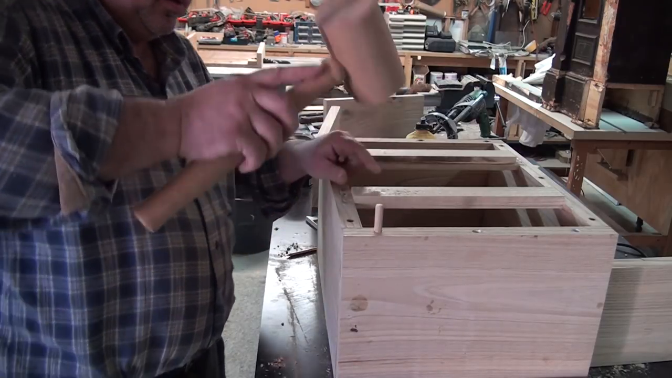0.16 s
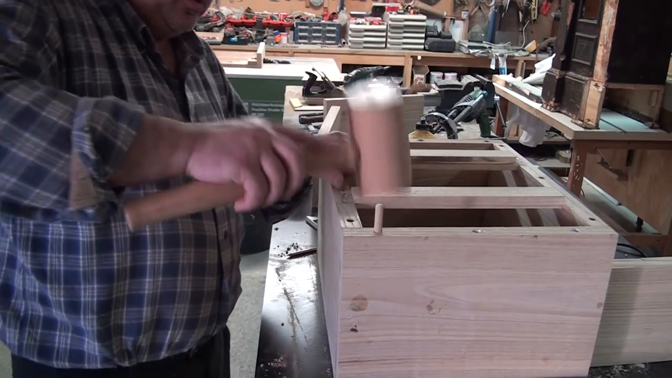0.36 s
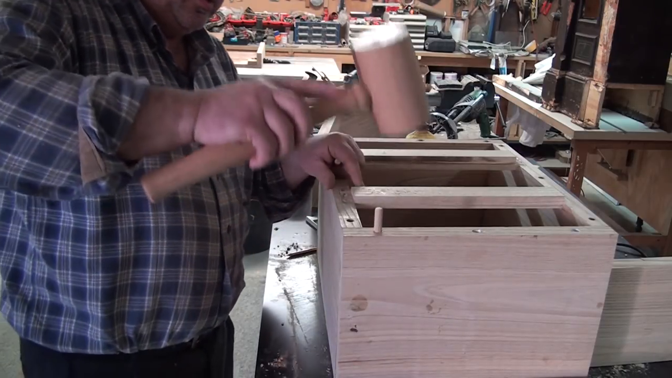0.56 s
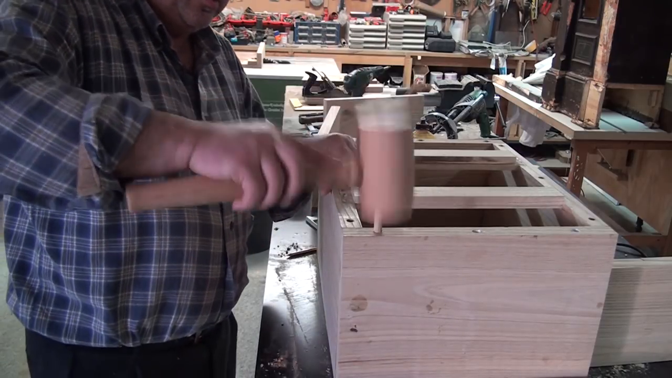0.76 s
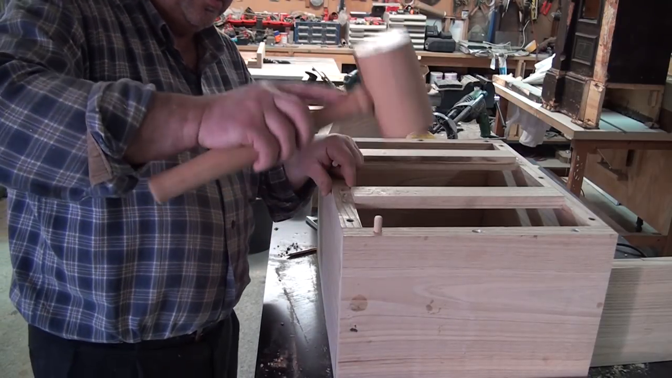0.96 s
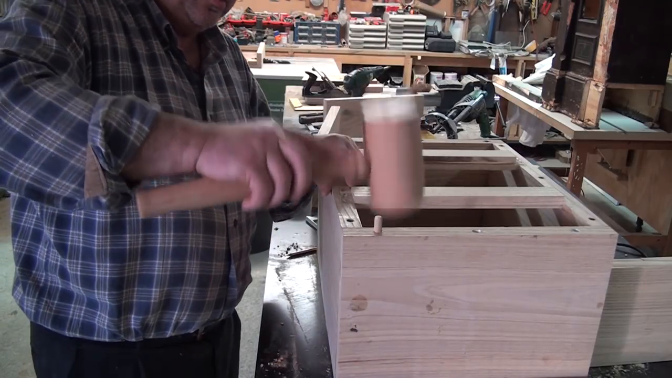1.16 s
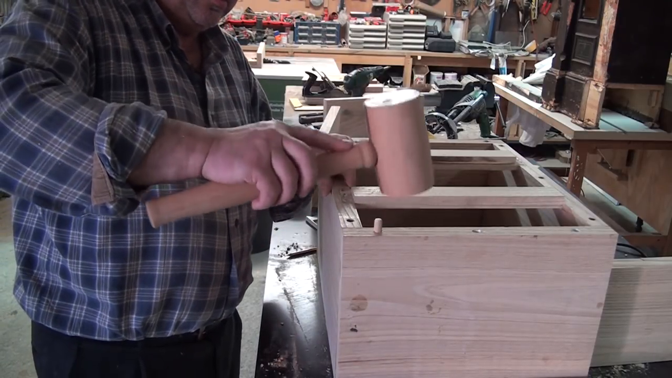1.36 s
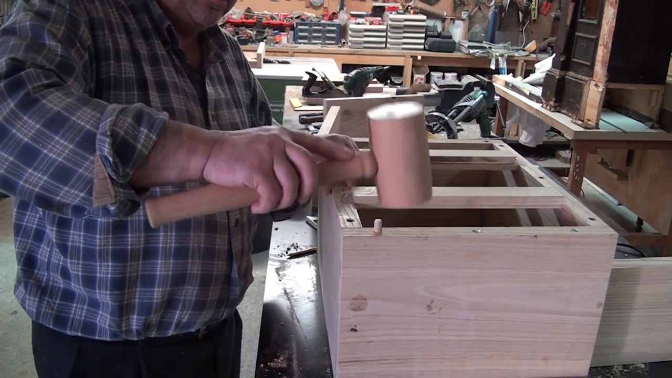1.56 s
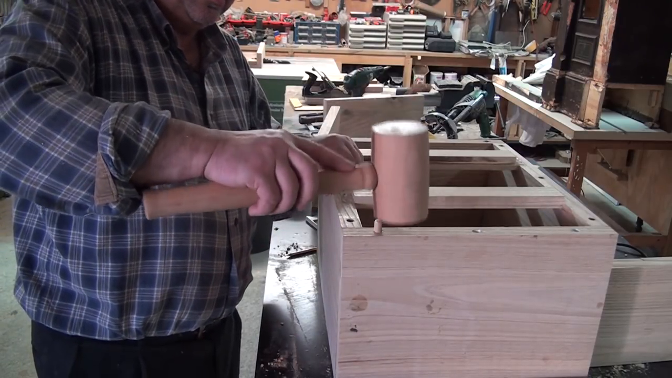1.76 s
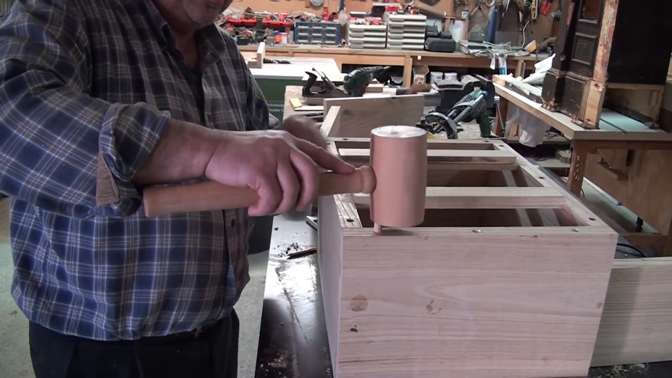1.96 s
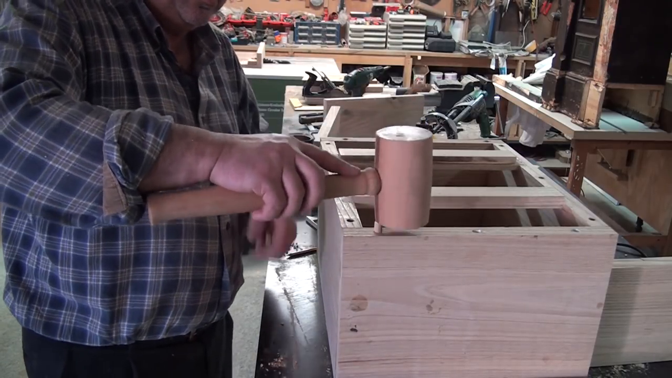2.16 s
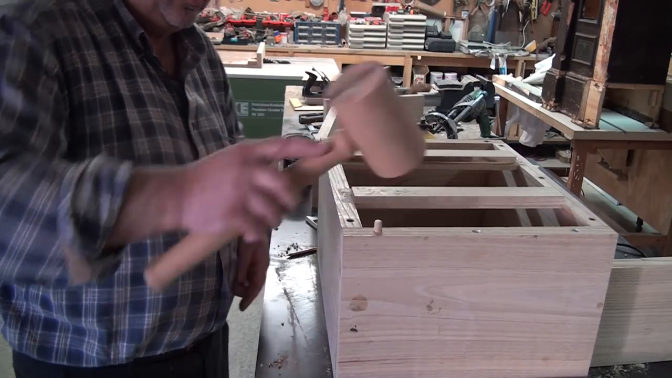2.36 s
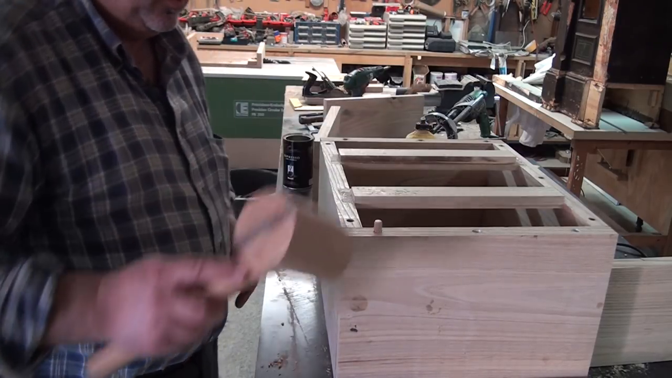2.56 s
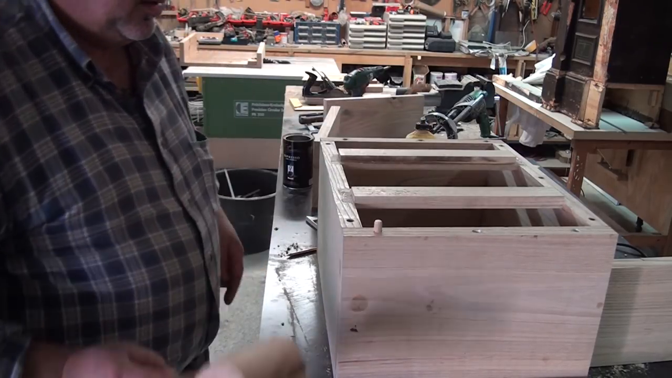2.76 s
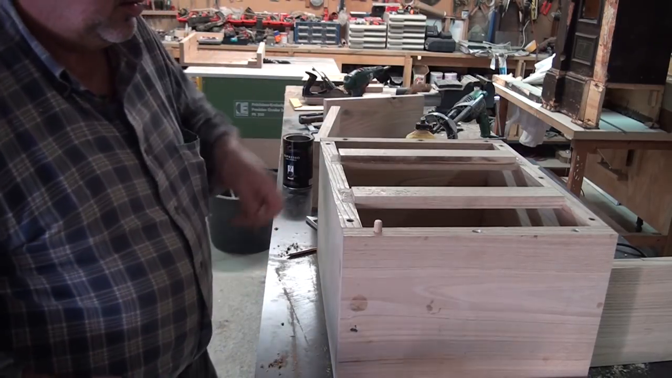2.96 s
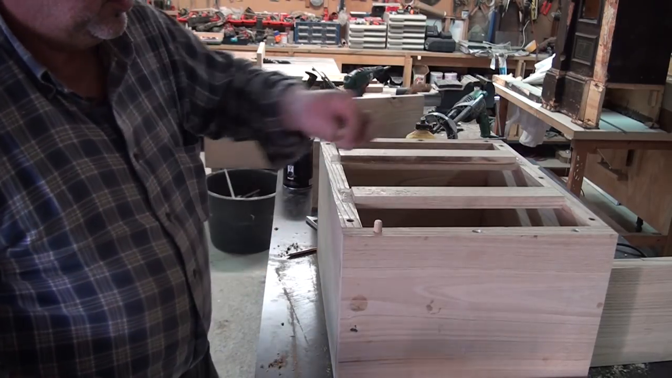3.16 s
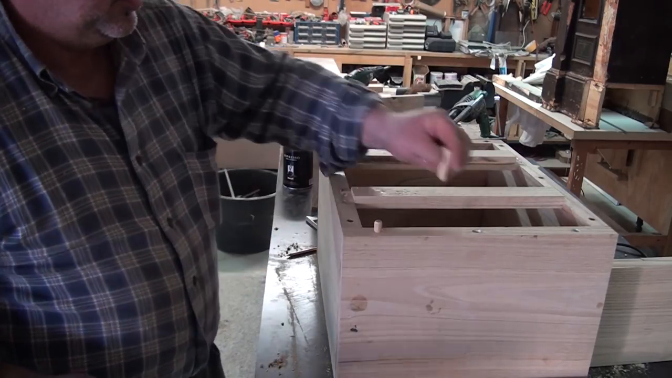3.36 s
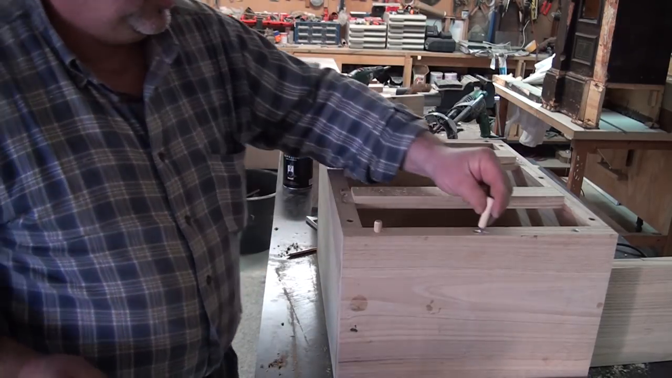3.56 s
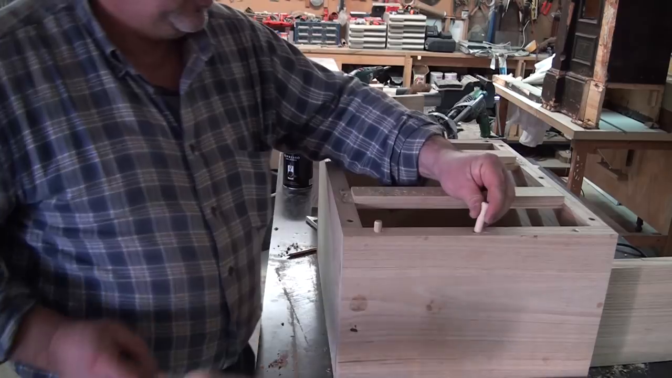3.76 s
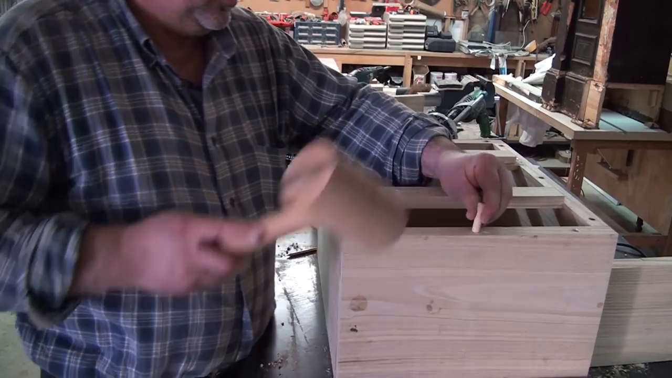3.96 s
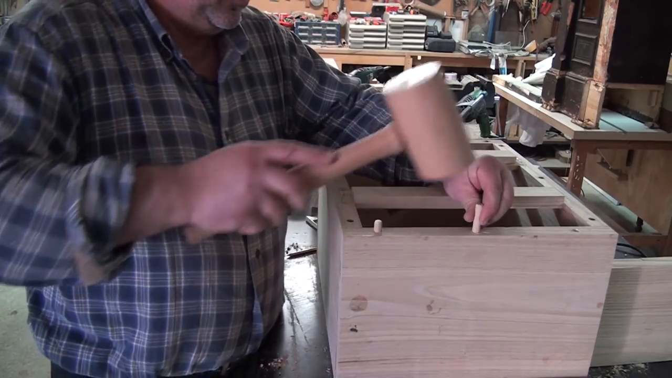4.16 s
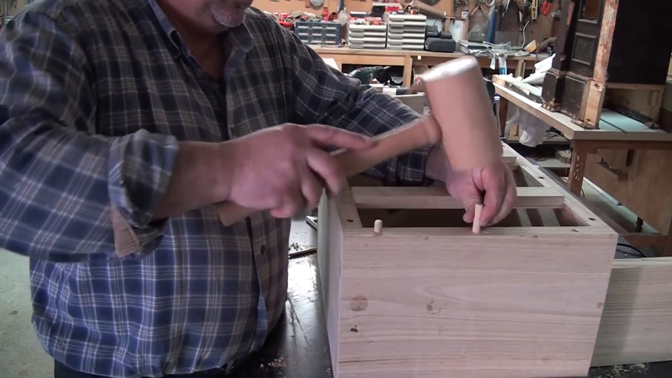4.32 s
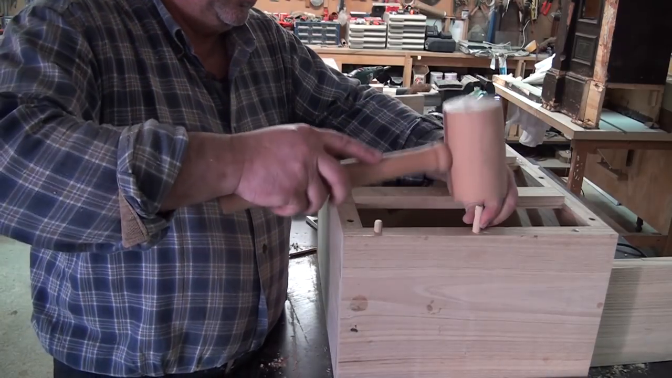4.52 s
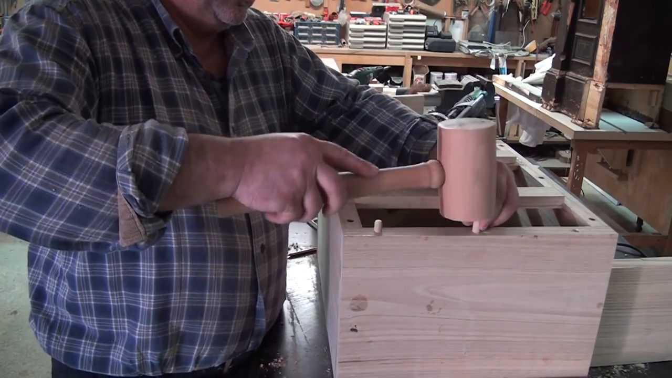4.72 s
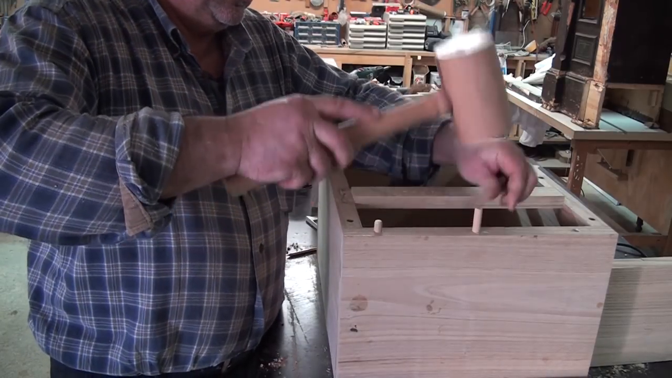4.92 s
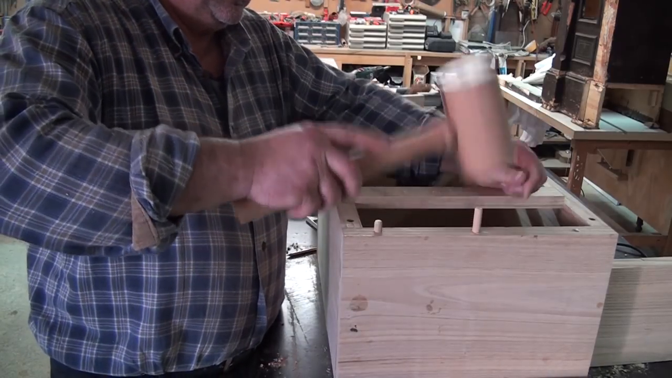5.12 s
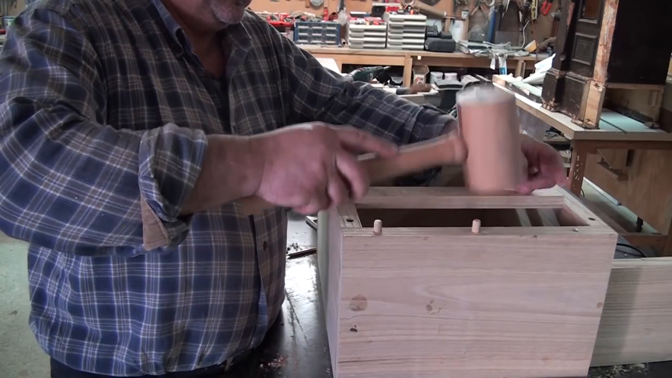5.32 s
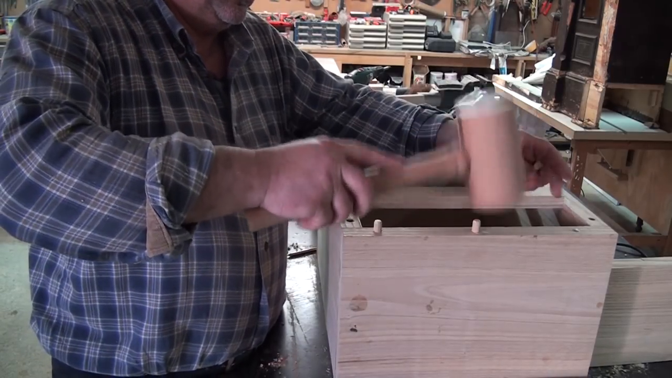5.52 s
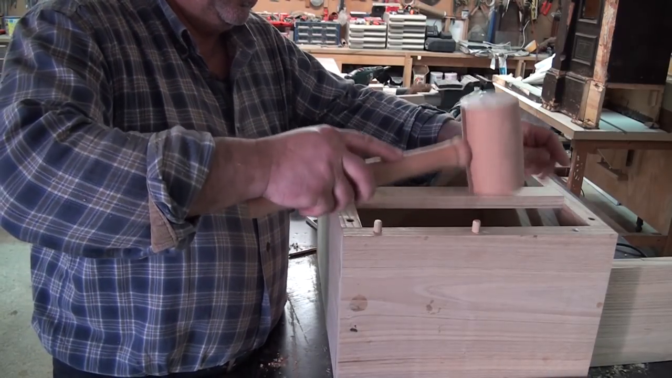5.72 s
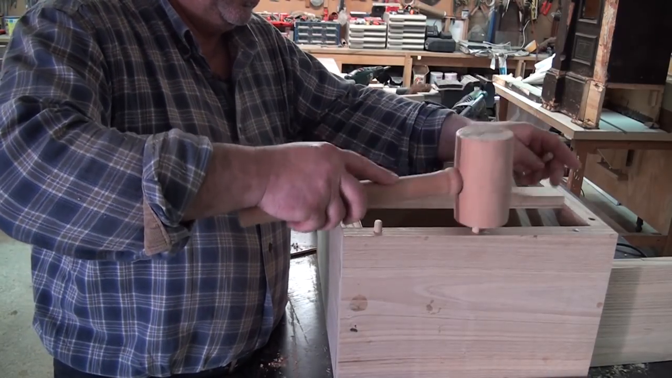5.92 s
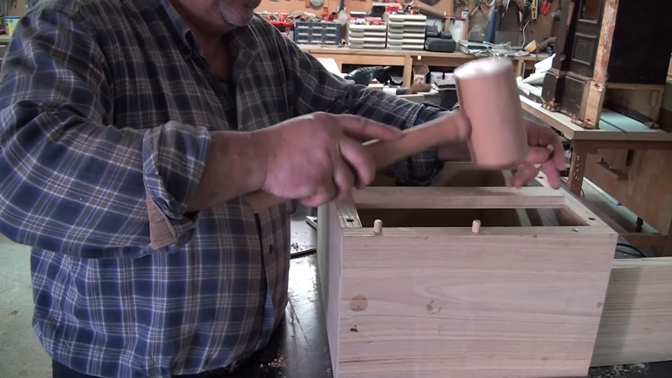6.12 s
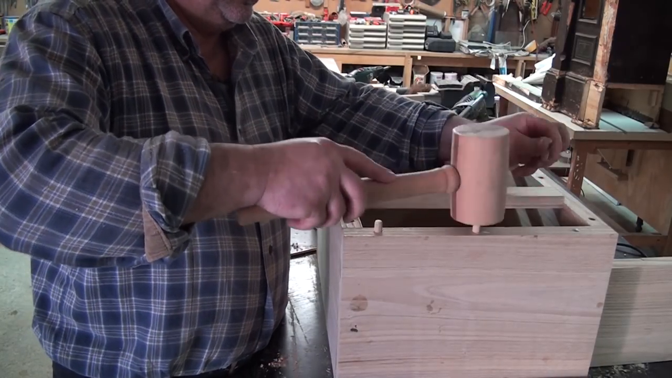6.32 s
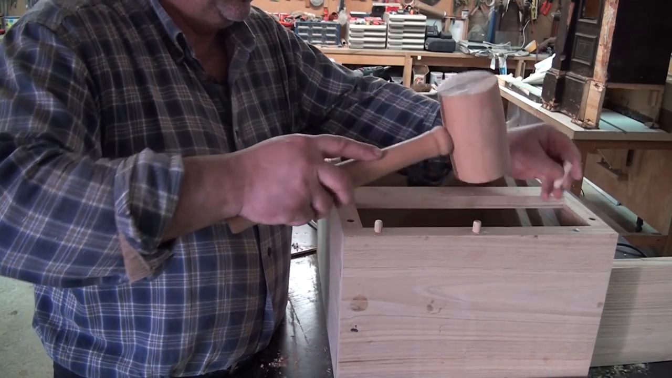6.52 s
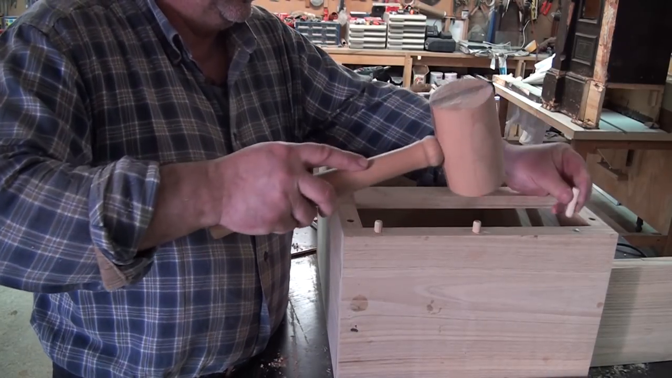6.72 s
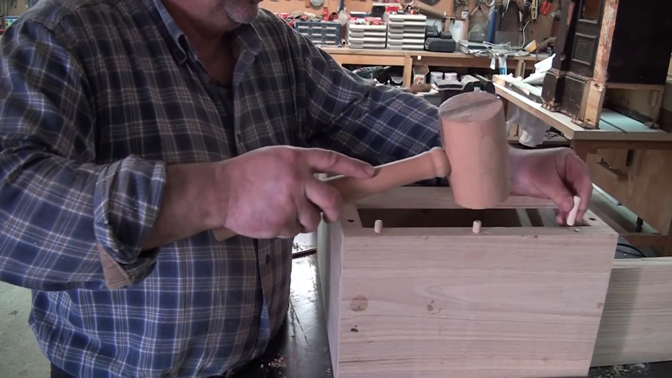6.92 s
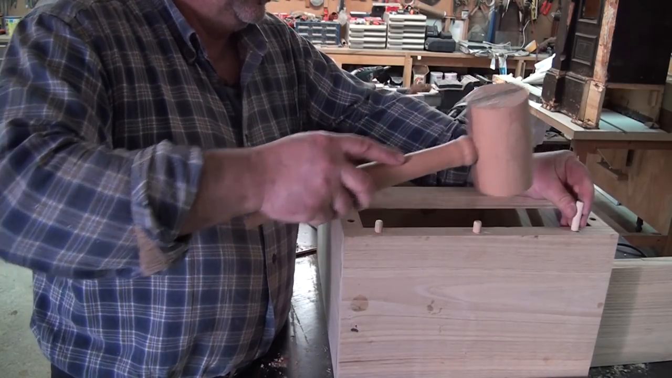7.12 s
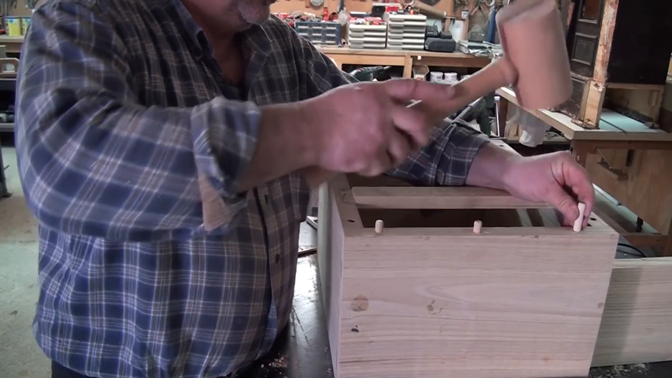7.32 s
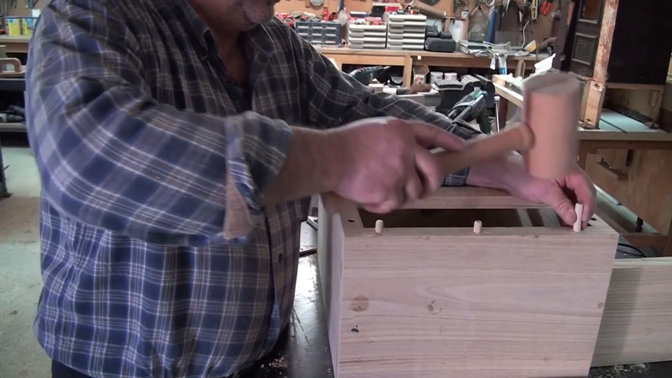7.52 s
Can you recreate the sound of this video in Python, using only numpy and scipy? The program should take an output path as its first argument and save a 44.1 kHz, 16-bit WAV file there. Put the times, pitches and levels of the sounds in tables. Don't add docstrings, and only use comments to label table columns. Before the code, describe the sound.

In a workshop with a short, diffuse reverberation, mallet blows land on wooden pegs in two groups. Each group starts with bright end-grain snaps and ends in full, boxy booms as the peg seats. Between them come small clicks of fingers and dowels and bright cloth friction. The knocks are close, loud and level-limited, over a quiet steady room hum.

```python
import sys
import numpy as np
from scipy import signal
from scipy.fft import rfft, irfft, next_fast_len
from scipy.io import wavfile
from scipy.ndimage import uniform_filter1d

SR = 44100
rng = np.random.default_rng(int(sys.argv[2]) if len(sys.argv) > 2 else 0)


def linear_from_db(decibels):
    return 10 ** (np.asarray(decibels, float) / 20)


def persist_wave(psi):
    counts = np.round(np.clip(psi, -1, 1) * 32767).astype(np.int16)
    wavfile.write(sys.argv[1], SR, np.atleast_2d(counts).T)


N = 334278

# (frequency [Hz], side minus mid [dB])
ROOM_WIDTH = [(60, 8), (110, -17.5), (380, -13.5), (1290, -15.5), (2380, -13.5), (4400, -12.5),
              (8120, -16.5), (15000, -29)]


def rms_one(x):
    return x / np.sqrt(np.mean(x ** 2) + 1e-20)


def at_hz(points, hz):
    points = np.array(points)
    return np.interp(np.log(hz), np.log(points[:, 0]), points[:, 1])


def convolve(x, response):
    size = next_fast_len(N + response.shape[-1])
    return irfft(rfft(x, size) * rfft(response, size), size)[..., :N]


def clicks(rows, levels_db):
    out = np.full(N, 1e-18)
    out[np.round(np.array(rows)[:, 0] * SR).astype(int)] = linear_from_db(levels_db)
    return out


def ring(x, hz, t60):
    r, w = linear_from_db(-60 / (t60 * SR)), 2 * np.pi * hz / SR
    return signal.lfilter([0, np.sin(w)], [1, -2 * r * np.cos(w), r * r], x)


def resonance(x, hz, width_hz):
    r, w = np.exp(-np.pi * width_hz / SR), 2 * np.pi * hz / SR
    return signal.lfilter(np.array([1, 0, -1]) * (1 - r * r) / 2, [1, -2 * r * np.cos(w), r * r], x)


def stereo_noise(size, spectrum, side):
    padded = next_fast_len(size, real=True)
    hz = np.maximum(np.arange(padded // 2 + 1) * SR / padded, 1)
    mid, diff = rfft(rng.standard_normal((2, padded))) * linear_from_db(at_hz(spectrum, hz))
    diff = diff * linear_from_db(at_hz(side, hz))
    return rms_one(irfft(np.array([mid + diff, mid - diff]), padded)[:, :size])


def workshop(wet_db, fill_s):
    # (frequency [Hz], t60 [s])
    decay = [(50, 0.144), (100, 0.56), (210, 0.45), (560, 0.44), (1470, 0.46), (3880, 0.47), (7000, 0.36),
             (14000, 0.25)]
    # (frequency [Hz], level [dB])
    colour = [(40, -17), (80, -17), (200, 7), (600, 2), (1500, 0), (3000, 4), (6000, 7), (12000, -5.5)]
    # (delay [s], level [dB])
    echoes = [(.0012, -14), (.004, -15.5), (0.012, -21), (.029, -17)]
    t = np.arange(SR) / SR
    noise, tail = stereo_noise(SR, colour, ROOM_WIDTH), 0
    edges = 40 * 2 ** np.arange(0, 9.01, 0.25)
    for low, high in zip(edges, edges[1:]):
        band = signal.sosfilt(signal.butter(2, [low, high], "band", fs=SR, output="sos"), noise)
        tail = tail + band * linear_from_db(-60 * t / at_hz(decay, np.sqrt(low * high)))
    power = np.mean(np.abs(rfft(tail)) ** 2, axis=0)
    even = np.sqrt(uniform_filter1d(power, size=260) / uniform_filter1d(power, size=28))
    tail = irfft(rfft(tail) * even, SR) * (t < 0.9)
    near = np.zeros(SR // 10)
    for delay_s, db in echoes:
        near[round(delay_s * SR)] = linear_from_db(db) * rng.choice([-1, 1])
    near[0] = 1
    return near, linear_from_db(wet_db) * tail * (1 - np.exp(-t / fill_s))


def heard(knock, rings, room, near_knock_db, far_rings_db):
    near, tail = room
    direct = convolve(linear_from_db(near_knock_db) * knock + rings, near)
    return direct + convolve(knock + linear_from_db(far_rings_db) * rings, tail)


def struck(blows, column, modes, contact_s, gain_db, spread_db, knock_db):
    force_db = np.array(blows)[:, column]
    low, high = modes[0][0] * 1.08, modes[-1][0] * 1.347
    band = signal.butter(2, [low, high], "band", fs=SR, output="sos")
    knock = signal.sosfilt(band, clicks(blows, force_db + knock_db))
    knock = knock * SR / (high - low) / 4
    rings = 0
    for k, (hz, db, t60) in enumerate(modes):
        longest_s = np.clip(70 / hz, 0.04, 0.3)
        strength_db = force_db + db + gain_db + spread_db * rng.standard_normal(len(blows))
        rings = rings + (-1) ** k * ring(clicks(blows, strength_db), hz, min(t60, longest_s))
    push = np.hanning(int(contact_s * SR) + 3)
    return signal.lfilter(push / push.sum(), 1, [knock, rings])


def room_hum():
    # (frequency [Hz], level [dB])
    hum_colour = [(12, -45), (20, -3.5), (63, 0), (123, 1), (459, -6), (1810, -11.5), (4540, -18.5),
                  (16000, -27.5)]
    # (frequency [Hz], side minus mid [dB])
    hum_width = [(60, -20), (110, -32), (200, -22), (380, -13), (1290, -11), (4400, -12.5), (8120, -15),
                 (15000, -16)]
    return linear_from_db(-50) * stereo_noise(N, hum_colour, hum_width)


def rubs():
    # (loudest at [s], rise [s], fall [s], hiss [dB], wood singing [dB])
    strokes = [(0.002, .01, .06, -48.5, -56), (0.064, 0.03, .032, -51, -42), (0.19, 0.026, 0.22, -51, -56),
               (0.784, .012, 0.011, -44, -59), (2.6, 0.64, 0.48, -61, -62), (2.944, .1, .15, -56.5, -82),
               (3.11, 0.04, .018, -51.5, -74), (3.59, 0.18, 0.17, -47.5, -60),
               (3.66, 0.18, 0.036, -44.5, -48.5), (3.96, .04, .15, -48.5, -54),
               (4.096, 0.026, .11, -57, -59), (7.38, 0.024, .04, -59, -71), (7.435, .04, .05, -57, -78),
               (7.488, 0.023, .035, -53.5, -64), (7.56, .04, .07, -56, -59)]
    # (frequency [Hz], level per Hz [dB])
    friction = [(2060, -42), (3500, -19), (4210, -14), (4840, -3.5), (5640, -8), (8530, -6.5), (15100, -16),
                (16000, -34)]
    t, hiss, sing = np.arange(N) / SR, np.zeros(N), np.zeros(N)
    for s, rise_s, fall_s, hiss_db, sing_db in strokes:
        swell = linear_from_db(-20 * np.maximum((s - t) / rise_s, (t - s) / fall_s))
        hiss += linear_from_db(hiss_db) * swell
        sing += linear_from_db(sing_db) * swell
    white = rng.standard_normal(N)
    tones = rms_one(resonance(white, hz=2890, width_hz=190))
    tones = tones + linear_from_db(-2.5) * rms_one(resonance(white, hz=479, width_hz=8.8))
    return hiss * stereo_noise(N, friction, ROOM_WIDTH) + sing * tones


def ticks():
    # (time [s], tick [dB], tick pitch [Hz], wood knock [dB])
    contacts = [(2.505, -41.5, 4250, -56), (2.541, -41, 4700, -58), (2.7438, -42, 4200, -60.5),
                (2.947, -34, 3000, -74), (2.9913, -39, 2800, -71), (3.262, -40, 5200, -66),
                (3.3018, -36.5, 5600, -60.5), (3.7044, -48, 2500, -54), (3.96, -52, 2800, -54),
                (4.1856, -51, 2400, -66), (7.1402, -50, 8800, -63), (7.1744, -55.5, 8600, -66),
                (7.2296, -60, 2760, -78)]
    # (frequency [Hz], level [dB], t60 [s])
    modes = [(473, -28, 0.036), (658, 4, 0.2), (1090, 10, 0.02), (1910, 5, 0.03)]
    knock, rings = struck(contacts, column=3, modes=modes, contact_s=0.00021,
                          gain_db=6.5, spread_db=1.5, knock_db=-7)
    for s, db, hz, _ in contacts:
        click = clicks([(s,)], db)
        knock += linear_from_db(5) * ring(click, hz, t60=30 / hz)
        knock += linear_from_db(21.5) * resonance(click, hz=8000, width_hz=1200)
    return heard(knock, rings, workshop(wet_db=-28, fill_s=0.004), near_knock_db=1, far_rings_db=2)


def touch(room):
    # (time [s], peak [dB])
    set_down = [
        (0.044, -25.5),
        (0.059, -19),
    ]
    # (frequency [Hz], level [dB], t60 [s])
    modes = [(457, -10, 0.024), (750, 0, 0.0089), (1450, 4, 0.0051), (1770, -8, 0.012), (3030, -28, 0.0071)]
    knock, rings = struck(set_down, column=1, modes=modes, contact_s=0.0001,
                          gain_db=-7.0, spread_db=7.5, knock_db=-5.5)
    return heard(knock, rings, room, near_knock_db=8, far_rings_db=-4)


def crack(blows, room):
    # (frequency [Hz], width [Hz], level [dB])
    snap_bands = [(3730, 5500, 1), (5110, 210, 2.5), (6100, 2200, -15.5), (8460, 1360, -1.5),
                  (10050, 2000, -6), (14100, 4500, -7)]
    gain_db, grit_db, decay_s = 5.5, -6.5, 0.0025
    near, tail = room
    t = np.arange(800) / SR
    hits = clicks(blows, blows[:, 1] + gain_db)
    snap_db = blows[:, 6] + gain_db + grit_db
    top_db = blows[:, 1] + 4.5
    shape = np.exp(-t / decay_s) * (1 - np.exp(-t / 0.0001))
    splinters = rng.choice([-1, 1], N)
    body = convolve(clicks(blows, snap_db), shape) * splinters
    top = convolve(clicks(blows, snap_db + top_db - 8.0), shape) * splinters
    body = signal.sosfilt(signal.butter(2, 7500, fs=SR, output="sos"), body)
    top = signal.sosfilt(signal.butter(2, 7500, "high", fs=SR, output="sos"), top)
    source = convolve(hits, tail) + convolve(body - top, near)
    return sum(linear_from_db(db) * resonance(source, hz, width) for hz, width, db in snap_bands)


def passed_on(blows, coupling):
    s, force_db, seated, lean_db, snap_db = np.transpose(blows)
    seated = np.clip(seated, 0, 1)
    panels, walls, rail, head = (force_db + standing + gained * seated for standing, gained in coupling)
    return np.transpose([s, force_db, panels, walls, rail + lean_db, head, force_db + snap_db])


def dowel(blows, walls, frame, head, room, panel_lag_s, air_hz, handle_db):
    # (frequency [Hz], level [dB], t60 [s])
    panels = [(80, -4, 0.6), (121.5, -2.5, 0.38), (136.7, 1, 0.31), (168, 7, 0.14)]
    handle = [(679.6, -3, 0.15), (1593, -15, 0.12)]
    dowel_modes = [(3350, 0, .02), (4090, -25, 0.042), (4690, -21, 0.056), (4920, -5.5, 0.051),
                   (5110, -8, 0.083), (5600, -15, 0.05)]
    late = blows.copy()
    late[:, 0] += panel_lag_s
    box = (struck(late, column=2, modes=panels, contact_s=0.00085, gain_db=-2.5, spread_db=0.0, knock_db=5.0)
           + struck(blows, column=3, modes=walls, contact_s=0.00093, gain_db=2.0, spread_db=1.5, knock_db=12.5))
    small = (struck(blows, column=4, modes=frame, contact_s=0.00055, gain_db=-4.5, spread_db=3.0, knock_db=15)
             + struck(blows, column=5, modes=head, contact_s=0.0001, gain_db=3.0, spread_db=0.5, knock_db=6.5)
             + struck(blows, column=1, modes=handle, contact_s=0.0003,
                      gain_db=handle_db, spread_db=3.5, knock_db=-33)
             + struck(blows, column=5, modes=dowel_modes, contact_s=0.0001,
                      gain_db=-6.5, spread_db=4.0, knock_db=8))
    sound = heard(*box, room, near_knock_db=-15, far_rings_db=-13)
    sound = sound + heard(*small, room, near_knock_db=-22, far_rings_db=-1)
    sound = sound + crack(blows, room)
    low_cut = signal.butter(3, 80, "high", fs=SR, output="sos")
    air = signal.butter(4, air_hz, fs=SR, output="sos")
    return signal.sosfilt(np.vstack([low_cut, air]), sound)


def first_dowel(room):
    # (time [s], force [dB], depth seated [0-1], lean towards the rail [dB], contact snap [dB])
    blows = [
        (0.4631, -6, 0.02, 3, 0),
        (0.843, -1.5, 0.05, 0, 2),
        (1.262, -2, 0.04, 0, 1.5),
        (1.516, -2.5, 0.24, -1.5, -1),
        (1.7612, -3, 0.84, -1.5, -2),
        (1.9957, -3, 0.87, 0, -4),
        (2.2203, -4, 1, 0, -2.5),
    ]
    # (level re force while standing [dB], gain once seated [dB])
    coupling = [(-24.5, 2), (-24.5, 19), (-23, 20), (-22, 4)]
    # (frequency [Hz], level [dB], t60 [s])
    walls = [(181.5, -6, 0.1), (218.3, 0, 0.18), (255, -1, 0.18), (300, -31, 0.043), (357, -1, 0.42),
             (416, 10, 0.032), (455, 5.5, 0.076), (485, 3.5, .15)]
    frame = [(529, -3, 0.046), (598, -0.5, 0.054), (636, -18, 0.02), (689, -7.5, 0.11), (723, -2, .1),
             (765, -5, .1), (865, -8, .08), (980, -25, .1), (1010, -7, .1)]
    head = [(1490, -6, 0.055), (1600, -4.5, 0.009), (1917, 1, 0.05), (1870, 7.5, 0.011), (2252, 0, 0.05),
            (2493, -0.5, 0.029), (2762, -2, 0.042), (2904, 2, 0.015), (3000, 3.5, 0.023)]
    return dowel(passed_on(blows, coupling), walls, frame, head, room,
                 panel_lag_s=0.0268, air_hz=11650, handle_db=-17)


def second_dowel(room):
    # (time [s], force [dB], depth seated [0-1], lean towards the rail [dB], contact snap [dB])
    blows = [
        (4.4962, -15, 0.02, 10, 7),
        (4.7855, -6, 0.042, -4.5, 2),
        (5.239, -4.5, 0.033, 2, -3.5),
        (5.6295, -2, 0.88, -1, -5),
        (5.9875, -4, 0.97, 1.5, -4.5),
        (6.3357, -2, 0.91, 1.5, -5),
    ]
    # (level re force while standing [dB], gain once seated [dB])
    coupling = [(-22, 6.4), (-23.5, 17.3), (-23.5, 21.3), (-23.5, 7.4)]
    # (frequency [Hz], level [dB], t60 [s])
    walls = [(210.6, -7, 0.23), (224.8, -4, 0.34), (267.5, -3, 0.16), (349.6, 0, 0.14), (361, 1.5, 0.27),
             (383.6, -2, 0.22), (519.7, -1.5, 0.097), (488.7, 0, .15)]
    frame = [(601.6, 0, .12), (656, 0.5, 0.11), (691, 5.5, .1), (728.5, 5, .1), (749.5, 7.5, .12),
             (803, 1.5, .1), (958, 3.5, 0.05), (1008, -1.5, .08), (1044.3, 7, .15)]
    head = [(1320, -6, 0.1), (1600, -36, .03), (1664, -8.5, 0.036), (1883, 3, 0.03), (2566, -3.5, 0.074),
            (2824, -4, 0.048), (2990, -9, 0.056), (3310, 0, 0.005)]
    return dowel(passed_on(blows, coupling), walls, frame, head, room,
                 panel_lag_s=0.0163, air_hz=11300, handle_db=-25)


def scene():
    corner = workshop(wet_db=-16, fill_s=0.00067)
    middle = workshop(wet_db=-17, fill_s=0.0048)
    handling = rubs() + ticks() + touch(corner)
    return room_hum() + handling + first_dowel(corner) + second_dowel(middle)


def limiter(x, top_db, release_db_per_s, attack_s):
    climb = release_db_per_s * np.arange(N) / SR
    over_db = np.maximum(20 * np.log10(np.abs(x).max(axis=0) + 1e-9) - top_db, 0)
    held_db = np.maximum.accumulate(over_db + climb) - climb
    r = np.exp(-1 / (attack_s * SR))
    return x * linear_from_db(-signal.lfilter([1 - r], [1, -r], held_db))


def roll_off(x):
    return signal.sosfilt(signal.butter(12, 16990, fs=SR, output="sos"), x)


def record(dry):
    x = limiter(dry, top_db=-3.5, release_db_per_s=279.0, attack_s=0.000043)
    x = 0.84 * np.tanh(x / 0.84)
    x = signal.sosfilt(signal.cheby2(12, 70, 17450, fs=SR, output="sos"), x)
    return roll_off(x)


dry = scene()
out = record(dry)
persist_wave(out)
```